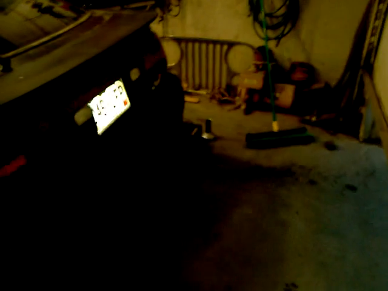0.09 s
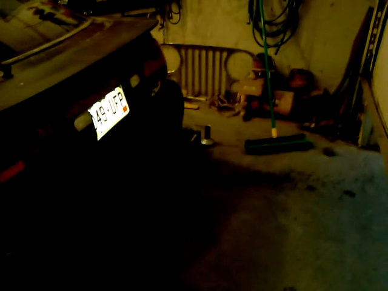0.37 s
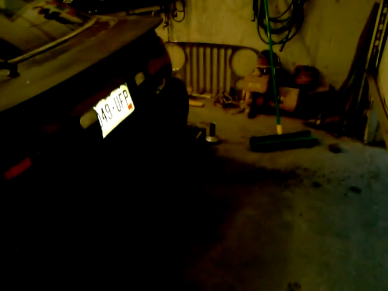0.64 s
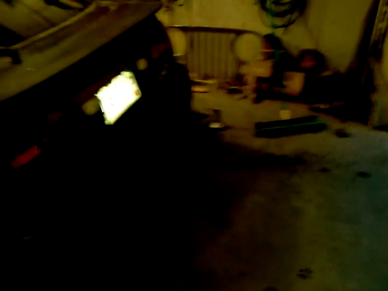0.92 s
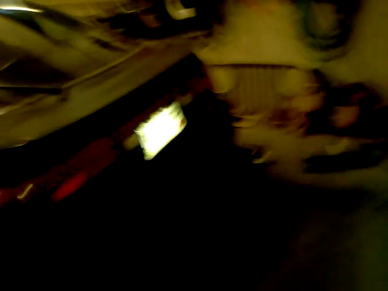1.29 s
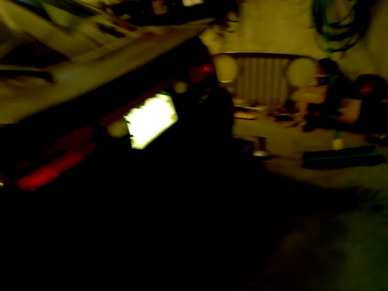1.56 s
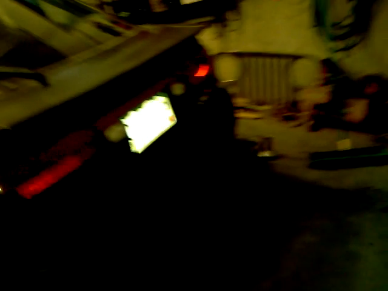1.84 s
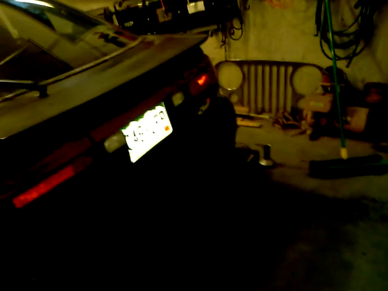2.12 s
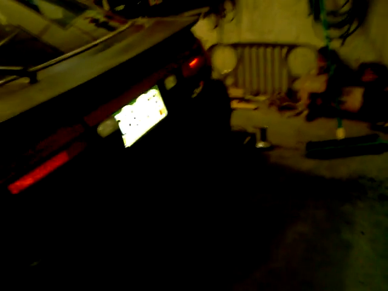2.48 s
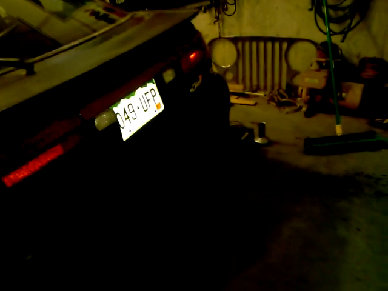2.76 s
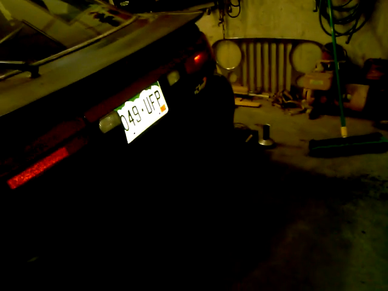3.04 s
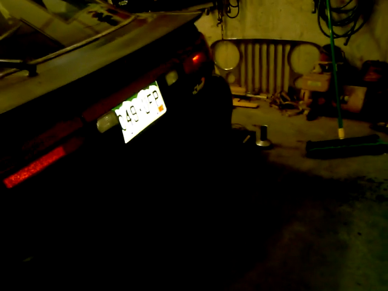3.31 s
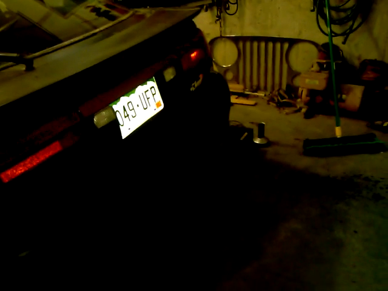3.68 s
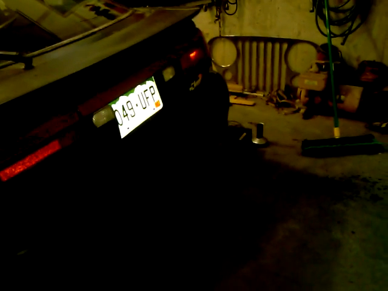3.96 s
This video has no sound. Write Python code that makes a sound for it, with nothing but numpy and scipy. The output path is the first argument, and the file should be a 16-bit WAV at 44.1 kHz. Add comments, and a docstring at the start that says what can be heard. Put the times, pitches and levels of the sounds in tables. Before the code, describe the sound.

A car engine revs up twice and holds high, booming and distorted in a garage.

```python
"""In a garage, close to the tailpipe, a four-cylinder car is revved: it sinks towards idle, rises twice
and holds high revs. The exhaust booms at the rate the cylinders fire, over a low rumble and a broad rush
of air that follows the revs. It thumps as the throttle opens near idle, and rasps and crackles under load.
A small narrow-band recorder is driven far into overload and squares off the boom."""
import sys
import numpy as np
from scipy import signal
from scipy.io import wavfile
from scipy.ndimage import uniform_filter1d

SR = 44100
rng = np.random.default_rng(int(sys.argv[2]) if len(sys.argv) > 2 else 0)


def wrap_up_sound(samples):
    """Save the sound to the file named by the first command line argument, as 16-bit audio."""
    columns = np.atleast_2d(samples).T
    # keep every value between -1 and 1, then stretch to whole-number steps
    tamed = np.clip(columns, -1, 1)
    steps = np.round(tamed * 32767).astype(np.int16)
    wavfile.write(sys.argv[1], SR, steps)


N = 176400
T = np.arange(N) / SR

# Engine speed. Each row: time in seconds, firings per second.
ENGINE_SPEED = [(0.08, 80), (0.21, 66), (0.35, 81.3), (0.5, 78), (0.66, 77), (0.83, 67.3), (1.05, 51.1),
                (1.15, 49.4), (1.25, 64.2), (1.35, 79.2), (1.5, 108), (1.7, 117), (2.0, 130.3),
                (2.14, 130.4), (2.52, 105.3), (2.66, 98), (2.74, 99), (3.01, 133.6), (3.12, 142.5),
                (3.5, 144.4), (4.0, 148.4)]
# Tones at one, two and three times the firing rate. Each row: time in seconds, level in dB.
BOOM_LEVEL = [(0.1, -6.5), (0.16, -31), (0.22, -7), (0.28, -16), (0.34, -4), (0.4, -8.5), (0.46, -5.5),
              (0.56, -9), (0.64, -6), (0.7, -16.5), (0.81, -10), (0.95, -12.5), (1.06, -21), (1.18, -14),
              (1.3, -9.5), (1.37, -2), (1.5, -3.5), (1.61, 3.5), (1.655, -6), (1.68, -3), (1.73, -6),
              (1.85, 1.5), (1.91, -3.5), (1.96, -14), (2.02, -1.5), (2.1, -0.5), (2.17, -1.5), (2.21, -13),
              (2.245, 3), (2.32, 0.5), (2.36, -7), (2.41, 2.5), (2.52, -2), (2.57, -10), (2.68, -6),
              (2.8, -1), (2.92, 4.5), (3.05, 7), (3.5, 7), (4.0, 13)]
DRONE_LEVEL = [(0.1, -9), (0.22, -11), (0.28, 0), (0.35, -8.5), (0.76, -12.5), (0.86, -19), (1.0, -14.5),
               (1.06, -44), (1.18, -12.5), (1.29, -2), (1.37, -1), (1.54, -4), (1.61, -12.5), (2.25, -21.5),
               (2.5, -14.5), (2.62, -8.5), (2.8, -1.5), (2.94, -9.5), (4.0, -9)]
BARK_LEVEL = [(0.08, -17), (0.3, -16.5), (0.52, -25), (0.7, -17.5), (1.08, -28.5), (1.24, -8), (1.32, -21),
              (1.43, -5), (1.54, -8), (1.61, -40), (1.8, -17), (1.93, -6.5), (2.03, -5.5), (2.14, -57),
              (2.6, -25), (2.79, -5.5), (2.92, -19), (3.02, -4.5), (3.3, -18), (4.0, -22)]
# The throttle, heard as the strength of the overtones. Each row: time in seconds, gain in dB.
THROTTLE = [(0.08, -20), (0.21, -17.5), (0.28, -9), (0.36, -11), (0.6, -26), (0.8, -16), (1.0, -22.5),
            (1.07, -22), (1.13, -28), (1.19, -21.5), (1.28, -9), (1.5, 0.5), (1.62, -4), (2.0, 2),
            (2.2, -7.5), (2.56, -11), (2.66, -9.5), (2.78, -5), (3.0, 8.5), (3.4, 4.5), (4.0, 10.5)]
# How the tailpipe and garage shape the overtones. Each row: frequency in Hz, gain in dB.
PIPE_RESPONSE = [(40, -32.5), (80, -5.5), (115, -5.5), (165, -2), (215, -11.5), (255, -4.5), (300, -8.5),
                 (345, -20.5), (400, -13.5), (450, -14), (560, -13.5), (660, -19), (900, -36.5),
                 (1500, -23)]
# How loud the three steady noises are. Each row: time in seconds, level in dB.
RUMBLE_LEVEL = [(0.08, -25), (0.5, -13), (0.8, -23.5), (1.07, -22), (1.17, -18.5), (1.3, -12.5),
                (1.55, -16), (1.72, -8.5), (1.9, -44), (2.3, -12.5), (2.57, -21), (2.68, -8.5), (2.9, -20),
                (3.2, -11.5), (3.45, -5.5), (3.72, -8.5), (4.0, -5.5)]
RUSH_LEVEL = [(0.08, -16.5), (0.3, -20.5), (0.6, -17), (0.85, -21.5), (1.1, -26.5), (1.25, -24), (1.5, -18),
              (1.75, -11.5), (2.0, -13), (2.2, -11), (2.4, -12.5), (2.6, -16), (2.85, -18.5), (3.05, -9.5),
              (3.5, -11.5), (4.0, -7.5)]
RASP_LEVEL = [(0.08, -35), (1.1, -32), (1.45, -17), (2.0, -53), (2.3, -33), (2.6, -21), (2.9, -14.5),
              (3.15, -12.5), (3.4, -19), (3.7, -11), (4.0, 0.5)]
# The mix of bass and treble in each noise. Each row: frequency in Hz, relative level in dB.
RUMBLE_SPECTRUM = [(30, -32), (60, -15), (110, 1), (170, 7), (260, -7.5), (480, -7), (800, -15),
                   (2000, -54)]
RUSH_SPECTRUM = [(100, 3.5), (300, 7.5), (550, -2), (900, 4), (1400, 2), (1900, 3.5), (2700, -1.5),
                 (3400, 4), (4200, -1)]
RASP_SPECTRUM = [(150, -15.5), (400, -1), (700, -5), (1300, -2), (2200, -21.5), (3600, -14)]
CRACKLE_SPECTRUM = [(150, -15), (400, 4), (700, 6), (1300, -1.5), (2200, -13), (3600, -22)]
# Thumps near idle and crackles at high revs. Each row: start in seconds, level in dB.
THUMP_EVENTS = [(1.124, -4), (1.147, -13), (1.185, -9)]
CRACKLE_EVENTS = [(1.645, -10), (2.935, -0.5), (3.008, 0), (3.146, 6), (3.173, 8.5), (3.181, 2),
                  (3.194, -1), (3.22, -4), (3.277, -4.5), (3.418, 0), (3.53, 4), (3.553, 1.5), (3.605, 4.5),
                  (3.643, 1), (3.665, 8), (3.68, -2), (3.69, 9.5), (3.722, -1), (3.762, 3.5), (3.804, 0),
                  (3.875, 1)]
# The overload whine, one entry a tone. First list: frequency in Hz. Second list: relative level in dB.
WHINE_TONES_HZ = [4000, 8000, 12000]
WHINE_LEVELS_DB = [-25.5, -31.5, -48.5]


def from_db(db):
    """Turn decibels into a number to multiply by."""
    return 10 ** (np.asarray(db) / 20)


def rms_one(x):
    """Scale a signal so its average strength (rms) is 1."""
    return x / np.sqrt(np.mean(x ** 2) + 1e-20)


def in_time(rows):
    """Join a table's points with straight lines, one value a sample."""
    return np.interp(T, *np.transpose(rows))


def at_hz(spectrum, hz):
    """Look up the dB at a frequency, with octaves evenly spaced."""
    points_hz, db = np.transpose(spectrum)
    return np.interp(np.log(hz), np.log(points_hz), db)


def drift(rate_hz):
    """A smooth random wobble about 1 in size; a higher rate wobbles faster."""
    step, warm_up = 40, 2000
    pole = np.exp(-2 * np.pi * rate_hz * step / SR)
    white = rng.standard_normal(N // step + warm_up + 2)
    slow = signal.lfilter([1], [1, -2 * pole, pole * pole], white)[warm_up:]
    return np.interp(np.arange(N) / step, np.arange(len(slow)), rms_one(slow))


def coloured_noise(spectrum, flicker_db=1.02):
    """Noise built from half-octave bands, each flickering a little."""
    out, edges_hz = 0, 25 * 2 ** np.arange(0, 7.6, .5)
    white = rng.standard_normal((2, N))
    for k, (low, high) in enumerate(zip(edges_hz, edges_hz[1:])):
        band = signal.sosfilt(signal.butter(2, [low, high], "band", fs=SR, output="sos"), white[k % 2])
        out += band * from_db(at_hz(spectrum, np.sqrt(low * high)) + flicker_db * drift(7.6))
    return rms_one(out)


def exhaust_note(firing_hz, phase, wander_rad=0.84, crank_db=-10, cam_db=-19):
    """The firings make three strong tones, plus overtones shaped by the pipe as the revs slide."""
    boom = from_db(in_time(BOOM_LEVEL) + 2.01 * drift(10.3)) * np.sin(phase)
    drone = from_db(in_time(DRONE_LEVEL)) * np.sin(2 * phase + wander_rad * drift(2.72))
    bark = from_db(in_time(BARK_LEVEL)) * np.sin(3 * phase)
    out = boom + drone + bark
    throttle_db = in_time(THROTTLE)
    uneven_phase = phase + 0.1 * drift(25)   # the firings are not quite evenly timed
    # The camshaft turns once in four firings and the crankshaft once in two, so tones fall on quarters.
    for quarters in range(2, 41):
        if quarters in (4, 8, 12):   # these are the boom, drone and bark
            continue
        multiple = quarters / 4
        shaft_db = cam_db if quarters % 2 else crank_db if quarters % 4 else 0
        flutter_db = 3.5 * drift(9.5)
        db = throttle_db + shaft_db + at_hz(PIPE_RESPONSE, multiple * firing_hz) + flutter_db
        offset = rng.uniform(0, 2 * np.pi) + wander_rad * drift(1.86)
        out += from_db(db) * np.sin(multiple * uneven_phase + offset)
    return out


def rumble():
    """Uneven firing makes a low noise."""
    return from_db(in_time(RUMBLE_LEVEL)) * coloured_noise(RUMBLE_SPECTRUM)


def air_rush():
    """Rushing air makes a broad noise."""
    return from_db(in_time(RUSH_LEVEL)) * coloured_noise(RUSH_SPECTRUM)


def rasp(phase, puff_depth=0.67):
    """Each firing pushes out a puff of swirling gas."""
    puffs = rms_one(np.exp(puff_depth * np.cos(phase)))
    return from_db(in_time(RASP_LEVEL)) * coloured_noise(RASP_SPECTRUM) * puffs


def thumps(ring_hz=110.2, rise_s=0.0051):
    """Single heavy firings make the silencer swell and ring for a few cycles."""
    out = 0
    for start, db in THUMP_EVENTS:
        age = np.maximum(T - start, 0)
        swell = age / rise_s * np.exp(1 - age / rise_s)
        out += from_db(db) * swell * np.sin(2 * np.pi * ring_hz * age)
    return out


def crackle_bursts(rise_s=0.00073, decay_s=0.0081):
    """The loudness of the exhaust crackles: each jumps up and quickly dies away."""
    bursts = 0
    for start, db in CRACKLE_EVENTS:
        age = np.maximum(T - start, 0)
        rise = np.minimum(age / rise_s, 1)
        fall = np.exp(-np.maximum(age - rise_s, 0) / decay_s)
        bursts += from_db(db) * rise * fall
    return bursts


def scene():
    """Engine speed drives the note and the rasp; the other sounds are added on top."""
    firing_hz = in_time(ENGINE_SPEED) * (1 + 0.0033 * drift(11.54))
    phase = 2 * np.pi * np.cumsum(firing_hz) / SR   # one cycle for each firing
    bursts = crackle_bursts()
    note = exhaust_note(firing_hz, phase) / (1 + 0.56 * bursts)   # the note falters at each crackle
    crackles = bursts * coloured_noise(CRACKLE_SPECTRUM)
    return (note + crackles + rumble() + air_rush() + rasp(phase) + thumps())[None]


def record(dry):
    """The recorder flattens the peaks and cuts the treble; a thin whine and fizz ride on the overload."""
    start_s, bias, clip_level, ceiling = 0.073, -0.054, 0.665, 0.73
    driven = (dry + bias) * (T > start_s)   # silent until the recorder starts
    clipped = np.clip(driven, -clip_level, clip_level)
    narrow = signal.sosfiltfilt(signal.butter(14, Wn=3708, fs=SR, output="sos"), clipped)
    # Whine and fizz grow with the share of the surrounding 11 ms that is clipped.
    clipped_share = uniform_filter1d(1.0 * (np.abs(driven) > clip_level), size=int(0.011 * SR))
    overload = np.clip((clipped_share - 0.023) / 0.39, 0, 1)
    whine = sum(from_db(db) * np.cos(2 * np.pi * hz * T)
                for hz, db in zip(WHINE_TONES_HZ, WHINE_LEVELS_DB))
    hiss = signal.sosfilt(signal.butter(2, Wn=3560, fs=SR, output="sos"), rng.standard_normal(N))
    fizz = from_db(-26) * rms_one(hiss)
    distorted = np.clip(narrow * (1 + overload * (whine + fizz)), -ceiling, ceiling)
    top_cut = signal.cheby2(20, 70, 16200, fs=SR, output="sos")   # blocks everything above 16200 Hz
    return signal.sosfilt(top_cut, distorted)


dry = scene()
out = record(dry)
wrap_up_sound(out)
```